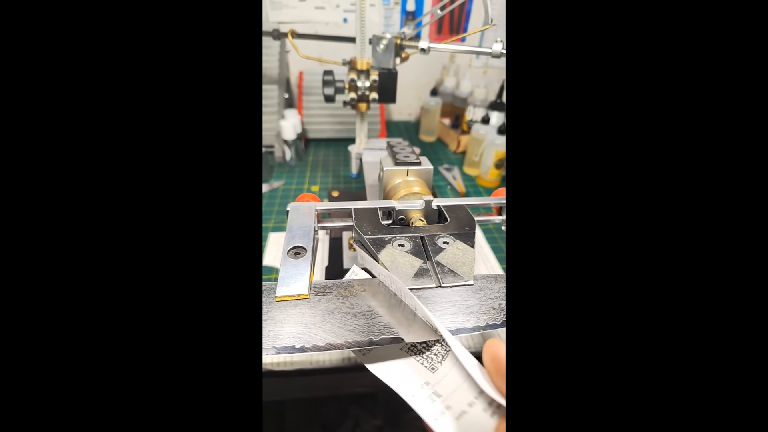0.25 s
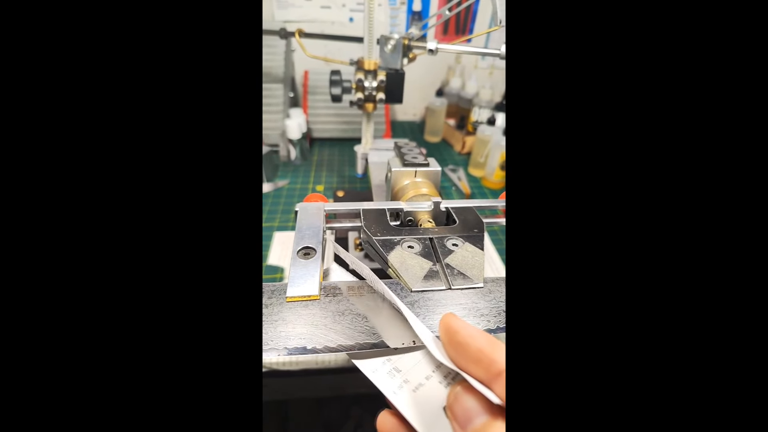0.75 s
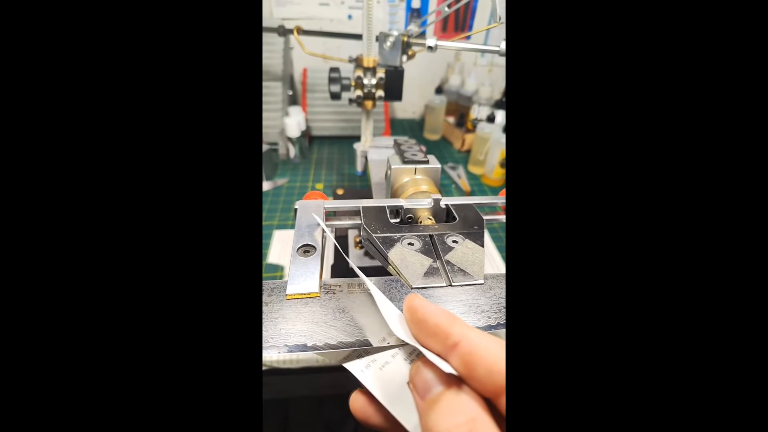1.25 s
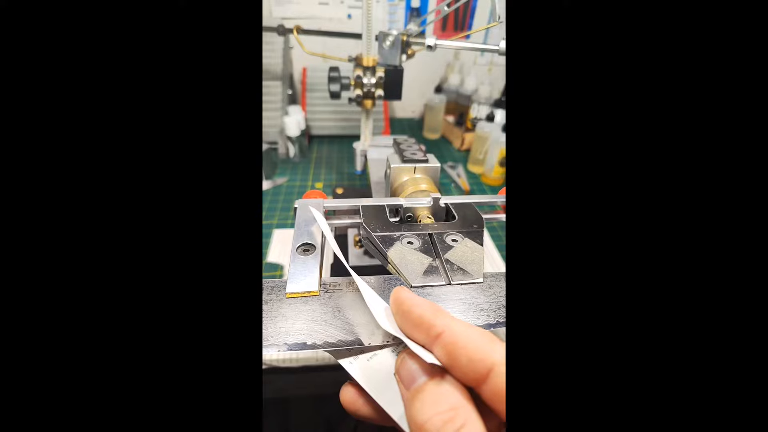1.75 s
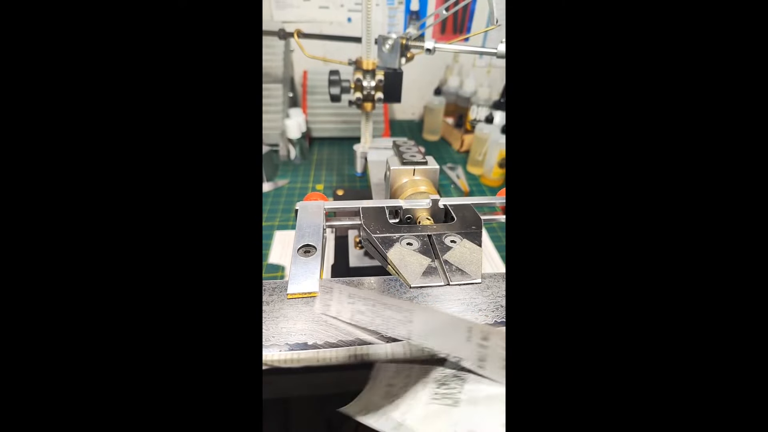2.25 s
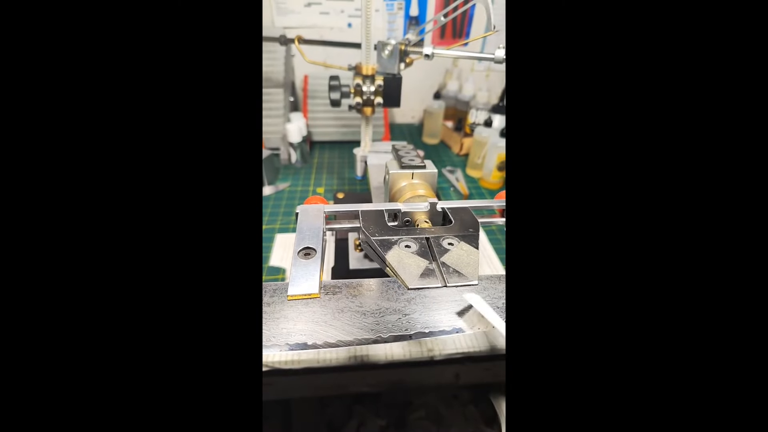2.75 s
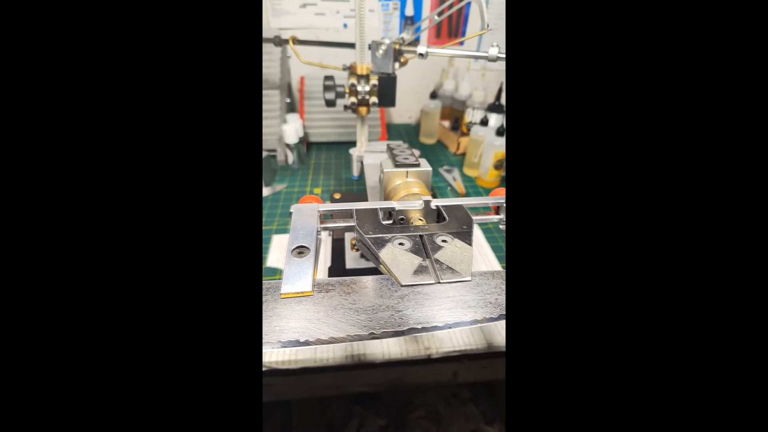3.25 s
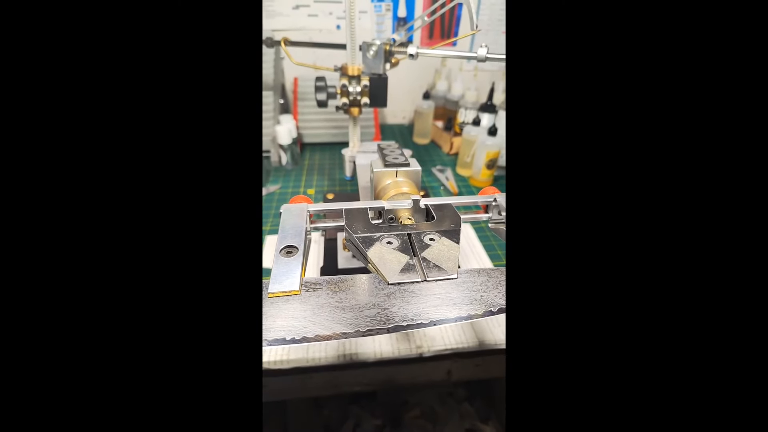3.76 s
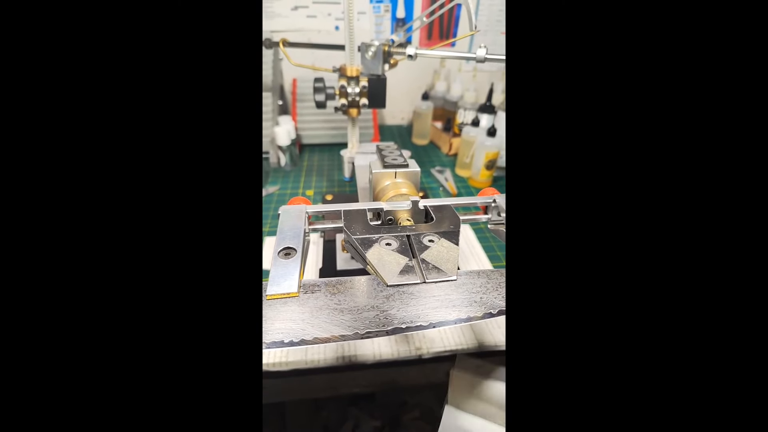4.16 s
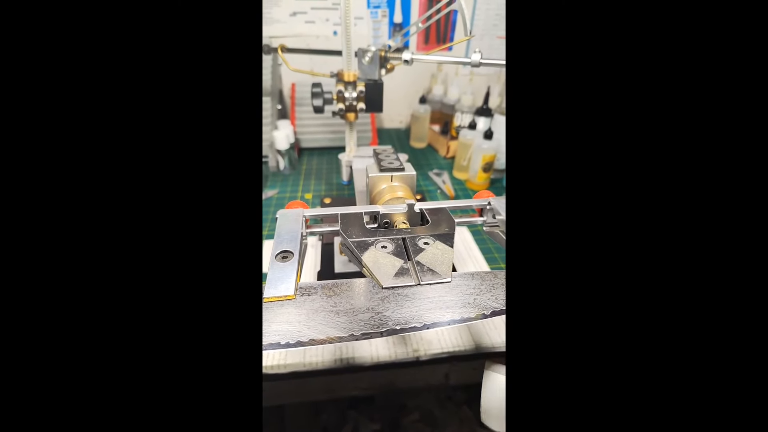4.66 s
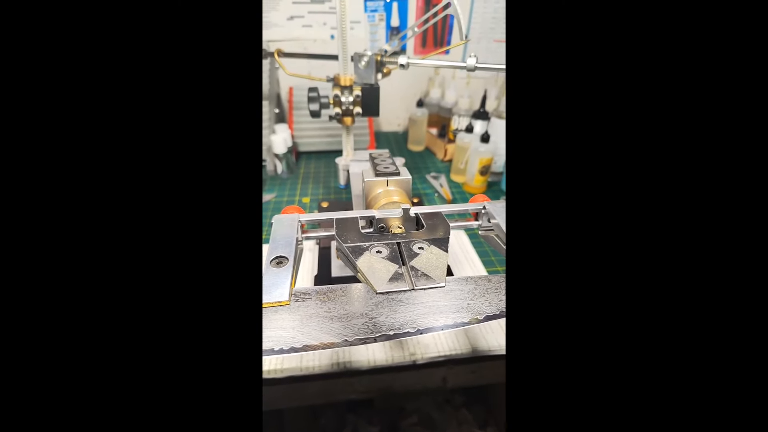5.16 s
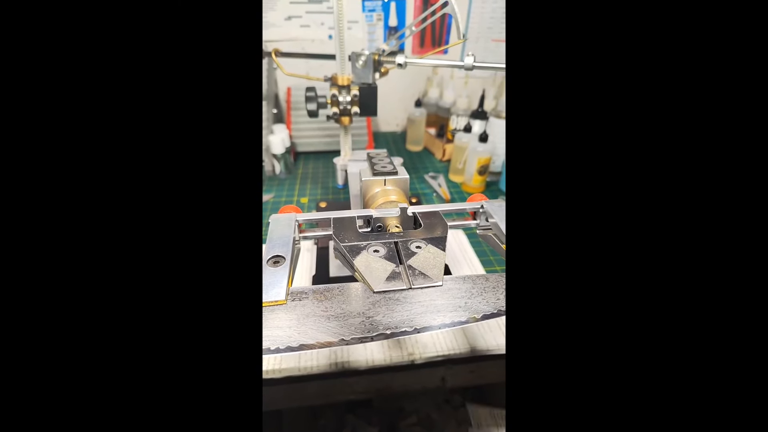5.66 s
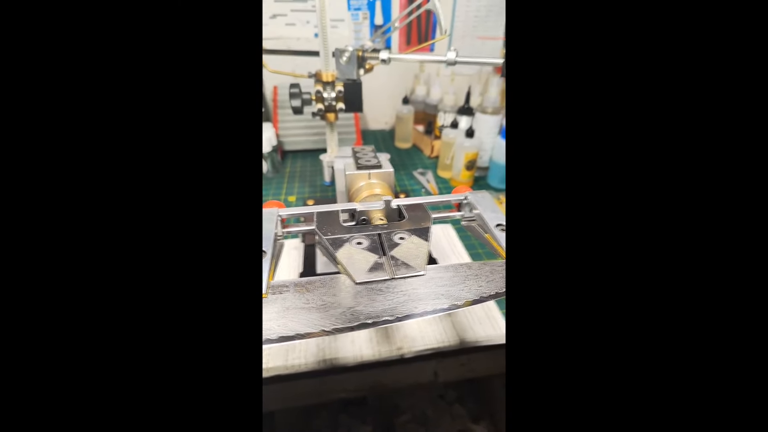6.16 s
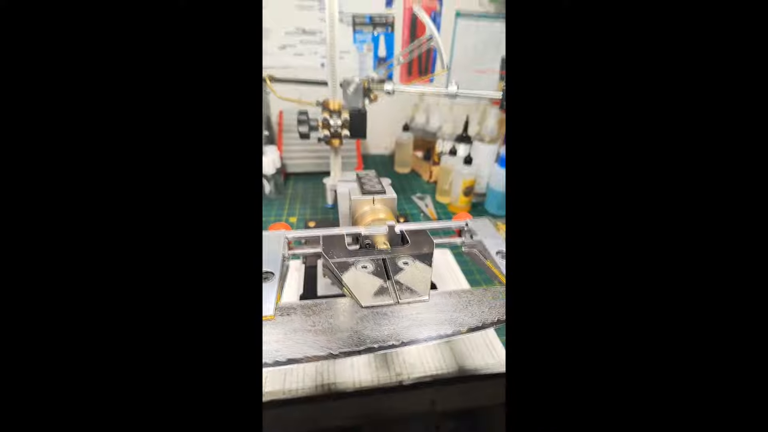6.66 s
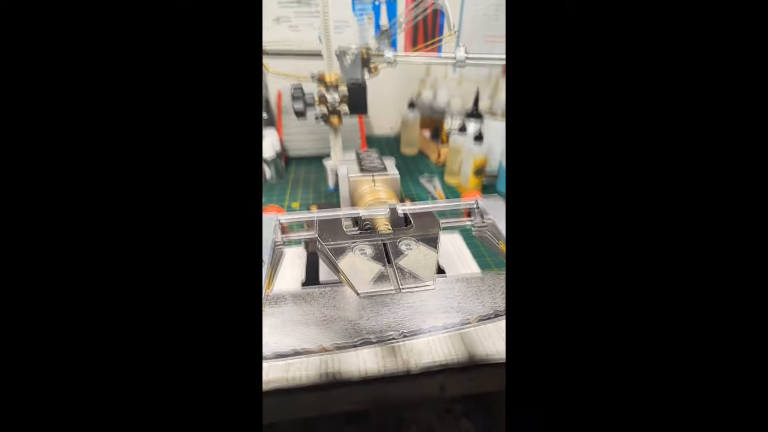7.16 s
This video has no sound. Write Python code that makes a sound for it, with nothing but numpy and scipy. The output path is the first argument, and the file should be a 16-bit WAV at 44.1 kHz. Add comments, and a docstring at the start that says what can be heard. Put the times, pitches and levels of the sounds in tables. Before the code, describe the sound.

Very close microphone in a small quiet workshop, with a short diffuse tail, soft room air and a barely audible low hum. From 0 to 1.1 s a sticky paper strip peels from a clamped blade: dense fine crackle and hiss, with a breathy resonance gliding down from high to middle pitch and small snaps at 0.1, 0.3 and 0.5. Around 1.16 s it jerks loose with a cluster of cracks and a short thump; a thinner, weaker peel with a lower, rising drone fades by 1.9. From 2.1 s the loose paper is folded: crisp snaps, strongest near 2.7 and 2.95, then sparser brief rustles and soft flaps around 3.5, 3.9 and 4.5 to 4.9. A sharp crack comes at 5.3, crumples near 6.0, and another bright snap at 6.5. A short loud rip swells in rapid slips from 6.76 to 6.9, stopping abruptly; faint ticks end it by 7.4.

```python
"""A hand peels a strip of sticky paper off a knife blade clamped in a sharpening jig, close to the microphone.
The glue lets go in a fine crackle of coloured grains and hiss, while the taut strip drones as gliding,
noise-driven resonances. Then the loose paper is folded and crumpled: sharp buckling snaps are short noise
bursts, soft thumps are sagging tones, rustles and one short loud rip are crackles with their own colours.
The place is a small quiet workshop with a short diffuse tail, room air and a faint hum."""
import sys
import numpy as np
from scipy import signal
from scipy.fft import rfft, irfft
from scipy.io import wavfile

SR = 44100
rng = np.random.default_rng(int(sys.argv[2]) if len(sys.argv) > 2 else 0)


def bounce(signal):
    """Save signal as a 16-bit WAV file at the path given by the first command-line argument."""
    frames = np.transpose(np.atleast_2d(signal))
    limited = np.clip(frames, -1, 1)
    pcm = np.round(limited * 32767).astype(np.int16)
    wavfile.write(sys.argv[1], SR, pcm)


N = 326781
BASS_EDGE_HZ, TREBLE_EDGE_HZ = 1400, 3600  # borders of the three registers
CONTROL_STEP_S = 0.001


def amp(db):
    """Decibels to gain."""
    return 10 ** (np.asarray(db) / 20)


def unit(x):
    """Scales to rms 1."""
    return x / np.sqrt(np.mean(x ** 2) + 1e-20)


def read(points, hz):
    """Reads a table on a logarithmic frequency axis."""
    f, value = np.transpose(points)
    return np.interp(np.log(hz + 1), np.log(f + 1), value)


def add(mix, s, sound):
    """Mixes a sound in at time s."""
    part = mix[max(round(s * SR), 0):][:len(sound)]
    part += sound[:len(part)]


def wander(count, hz):
    """Slow chance: straight lines between normal random knots, hz knots a second."""
    knots = rng.standard_normal(4096)
    return np.interp(np.arange(count) * hz / SR, np.arange(len(knots)), knots)


def envelope(t, start, end, attack_s, release_s):
    """Linear attack, hold, exponential release."""
    attack = np.clip((t - start) / attack_s, 1e-5, 1)
    return attack * np.exp(-np.clip((t - end) / release_s, 0, 12))


def colour(x, points, ripple_db=0, pitch=1, ripple_hz=200, size=2048):
    """Causal minimum-phase filter; a random ripple makes the colour of each patch of paper uneven."""
    hz = abs(np.fft.fftfreq(size, 1 / SR))
    heights = np.clip(rng.standard_normal(size), -2, 2)
    ripple = np.interp(hz / ripple_hz, np.arange(size), heights)
    ripple *= np.minimum(hz / TREBLE_EDGE_HZ, 1)  # the ripple is shallower at low frequencies
    log_gain = np.log(amp(read(points, hz / pitch) + ripple_db * ripple))
    ring = np.fft.ifft(np.exp(np.conj(signal.hilbert(log_gain)))).real
    return signal.oaconvolve(x, ring[:size // 2])[:len(x)]


def registers(x):
    """Splits a sound into middle, treble and bass, each of rms 1."""
    edges = [([BASS_EDGE_HZ, TREBLE_EDGE_HZ], "bandpass"), (TREBLE_EDGE_HZ, "highpass"),
             (BASS_EDGE_HZ, "lowpass")]
    parts = []
    for hz, kind in edges:
        band = signal.butter(3, hz, kind, fs=SR, output="sos")
        parts.append(unit(signal.sosfiltfilt(band, x, padtype=None)))
    return parts


def voice(x, db, treble_db, bass_db):
    """Stiff creases radiate treble, wide slack parts of the sheet radiate bass (both relative to the middle)."""
    middle, treble, bass = registers(x)
    return amp(db) * (middle + amp(treble_db) * treble + amp(bass_db) * bass)


def crackle(rows, spectrum, grains_per_s, spread_db, hiss_db, clump_db, clump_hz, ripple_db, shift_oct,
            patch_s=0.035, count=16):
    """Fibres and glue threads let go in clumps over sliding hiss, on patch after patch of differing colour.

    Rows: (time [s], middle level [dB], treble [dB re middle], bass [dB re middle])."""
    s, *columns = np.transpose(rows)
    t = np.arange(s[0], s[-1], 1 / SR)
    sizes = amp(spread_db * np.minimum(rng.exponential(1, len(t)), 4))
    sizes *= rng.choice([-1, 1], len(t))
    grains = unit(sizes * (rng.random(len(t)) < grains_per_s / SR))
    hiss = amp(hiss_db) * rng.standard_normal(len(t))
    drive = (grains + hiss) * amp(clump_db * wander(len(t), clump_hz))

    step = ((t - s[0]) / patch_s + rng.random(len(t))).astype(int)  # neighbouring patches overlap
    patch = rng.integers(0, count, len(t))[step]
    pitch = 2 ** (shift_oct * np.linspace(-1, 1, count))
    sound = np.zeros(len(t))
    for k in range(count):
        here = patch == k
        sound += unit(colour(drive * here, spectrum, ripple_db, pitch[k])) * np.sqrt(np.mean(here))

    out = np.zeros(N)
    add(out, s[0], voice(sound, *(np.interp(t, s, column) for column in columns)))
    return out


def peeling():
    """The pull sets the level and colour of the crackling glue: a slow peel is thin and bright, a hard one fuller."""
    # how hard the strip is pulled off the blade, before jerk and surges: (time [s], level [dB])
    pull_points = [(0, -37), (.15, -41), (.55, -36.5), (.78, -42), (.95, -38), (1.14, -39), (1.235, -50.5),
                   (1.29, -44), (1.46, -47), (1.56, -54), (1.65, -50), (1.7, -58.5), (1.805, -55.5),
                   (1.87, -76)]
    # colour of the glue: (frequency [Hz], relative density [dB per Hz])
    glue = [(55, -54), (85, -15), (450, -10.5), (1100, -6.5), (1800, -6.5), (2850, -7.5), (3500, -13),
            (4500, -15.5), (5500, -9.5), (6740, -16), (7600, -7.5), (12000, -20)]
    jerk_s, jerk_width_s, jerk_db = 1.173, 0.021, 11.5  # the strip jerks loose once, partway along
    surge_db, surge_hz = 1.16, 28.1  # the glue holds unevenly
    reference_db, treble_db, bass_db = -40, -0.5, -6.5  # colour at the reference pull
    treble_slope, thinnest_db = -0.59, -11  # dB per dB of pull; lowest pull re reference that still brightens
    s, pull = np.transpose(pull_points)
    t = np.arange(0, s[-1], CONTROL_STEP_S)
    db = np.interp(t, s, pull)
    jerk = jerk_db * np.exp(-((t - jerk_s) / jerk_width_s) ** 2)
    surges = surge_db * np.interp(t * SR, np.arange(N), wander(N, surge_hz))
    treble = treble_db + treble_slope * np.maximum(db - reference_db, thinnest_db)
    rows = np.column_stack([t, db + jerk + surges, treble, np.full(len(t), bass_db)])
    return crackle(rows, glue, grains_per_s=800, spread_db=1.0, hiss_db=-0.5, clump_db=1.5, clump_hz=199,
                   ripple_db=5.5, shift_oct=0.023)


def strip(rows, width_hz, upper_ratio, upper_db, flutter_db=3, flutter_hz=110, sway_oct=0.07, sway_hz=28):
    """Noise keeps two resonances of the taut strip sounding in uneven spurts; each sways in pitch."""
    s, hz, db = np.transpose(rows)
    t = np.arange(s[0], s[-1], 1 / SR)
    r = np.exp(-np.pi * width_hz / SR)
    out = np.zeros(N)
    for ratio, mode_db in (1, 0), (upper_ratio, upper_db):
        pitch = ratio * np.interp(t, s, hz) * 2 ** (sway_oct * wander(len(t), sway_hz))
        noise = rng.standard_normal(len(t)) + 1j * rng.standard_normal(len(t))
        swing = signal.lfilter([1], np.poly([r, r]), noise)
        carrier = np.exp(2j * np.pi * np.cumsum(pitch) / SR)  # lifts the slow swing to the mode's pitch
        tone = unit((swing * carrier).real * amp(flutter_db * wander(len(t), flutter_hz)))
        add(out, s[0], tone * amp(np.interp(t, s, db) + mode_db))
    return out


def peel_drone():
    """The taut strip rings as it is pulled, in two pulls."""
    # lower resonance of the taut strip in each pull: (time [s], pitch [Hz], level [dB])
    first_pull = [(0, 2300, -39), (.22, 2128, -38), (.47, 1791, -36.5), (.72, 1647, -43.5),
                  (1.14, 1870, -63)]
    second_pull = [(1.18, 623, -48), (1.205, 649, -32.5), (1.235, 690, -52), (1.39, 994, -47.5),
                   (1.55, 953, -65), (1.63, 1052, -43.5), (1.675, 1130, -57), (1.8, 1250, -62)]
    first = strip(first_pull, width_hz=530, upper_ratio=1.33, upper_db=-11)
    second = strip(second_pull, width_hz=300, upper_ratio=2.7, upper_db=-9)
    return first + second


def workshop(x, tail_db=-14, delay_s=0.0041, size=16384):
    """Bench and walls return a short diffuse tail: noise that decays at its own rate in each band."""
    # decay of the workshop: (frequency [Hz], time to fall by 60 dB [s])
    room = [(150, 0.26), (1000, 0.13), (3000, 0.071), (9000, 0.084)]
    hz, t, z = signal.stft(rng.standard_normal(size), SR, nperseg=256)
    tail = signal.istft(z * amp(-60 * t / read(room, hz)[:, None]), SR)[1]
    tail *= np.arange(len(tail)) / SR > delay_s
    return x + amp(tail_db) * signal.fftconvolve(x, tail / np.linalg.norm(tail))[:N]


def background(air_db=-51.5, hum_hz=147.6, hum_db=-62, waver_db=2):
    """Room air is shaped noise; a faint hum wavers in phase and level."""
    # colour of the room air: (frequency [Hz], relative density [dB per Hz])
    air_colour = [(20, 6.5), (60, -17), (90, 2), (450, -8), (1050, -11.5), (3400, -17.5), (6400, -27.5),
                  (9300, -23)]
    hz = np.fft.rfftfreq(N, 1 / SR)
    air = unit(irfft(rfft(rng.standard_normal(N)) * amp(read(air_colour, hz)), N))
    phase = 2 * np.pi * hum_hz * np.arange(N) / SR + 0.51 * wander(N, 8.9)
    hum = unit(np.sin(phase) * amp(waver_db * wander(N, 3.0)))
    return amp(air_db) * air + amp(hum_db) * hum


def snaps(flutter_db=-21, flutter_s=0.0071, creep_db=-21, creep_s=0.0013, rise_s=0.00008, ripple_db=4,
          body_db=10, body_width_hz=850, edge_db=5, edge_hz=7600, edge_scatter_hz=450, edge_width_hz=900,
          evenness=0.73, size=3000, lead_count=150):
    """A crease creeps, flips over in a short broadband crack and leaves the sheet shivering at two resonances."""
    # a crease buckles or the paper jerks free: (time [s], middle level over 5 ms [dB],
    # treble [dB re middle], fading time [s], body resonance [Hz])
    creases = [(0.0965, -24, 4.5, .0019, 2500), (0.3293, -30.5, -12, .0044, 2080),
               (.541, -30, -22, 0.0055, 1930), (1.0704, -33, -23, 0.0059, 1860),
               (1.1586, -27, 1, 0.0025, 1830), (1.1618, -24, 2.5, 0.0068, 2170),
               (1.173, -21, -8, 0.0037, 2400), (2.108, -20.5, -9, 0.00077, 2230),
               (2.191, -24, -1, .0007, 2660), (2.33, -37.5, -12, .0013, 2380),
               (2.375, -30, -11, 0.0017, 2100), (2.3803, -27.5, -1, 0.0013, 2270),
               (2.53, -28, -20, 0.0013, 1990), (2.559, -31.5, -25, .0013, 2370),
               (2.588, -32.5, -23, 0.0018, 2320), (2.6542, -32, -18, 0.00077, 2300),
               (2.669, -26.5, -20, 0.0019, 2380), (2.7051, -13.5, 6, .0006, 2600),
               (2.7891, -39.5, 10, 0.0045, 2320), (2.81, -34, 2, .0041, 2340),
               (2.9176, -35.5, -12, 0.0045, 2620), (2.935, -27.5, 5, .0015, 2720),
               (2.9464, -14, 2, 0.00048, 2500), (2.9796, -29, -11, 0.00038, 2840),
               (3.074, -34.5, -24, 0.0026, 2550), (3.4603, -32, -9, 0.0027, 2520),
               (3.4824, -26, 13.5, .0011, 2570), (3.8186, -33, -5, .002, 2410),
               (3.832, -32, 9.5, 0.00077, 2560), (3.9947, -39, 2, 0.0046, 2650),
               (4.072, -40.5, -15, 0.0035, 2400), (4.4632, -32, 3.5, .0025, 2610),
               (4.4698, -31, 0, 0.0024, 2520), (4.491, -32, 0, 0.0012, 2770), (4.501, -30, 8, 0.0009, 2830),
               (4.5106, -23.5, 10.5, 0.0038, 2880), (4.6536, -28.5, 4, 0.0026, 2640),
               (4.6848, -26, 1, 0.0024, 2790), (4.7358, -23.5, -10.5, 0.00074, 2810),
               (4.819, -36.5, 10.5, .0017, 2450), (4.9309, -31, -22, .0028, 2480),
               (4.9437, -29.5, 4, 0.0019, 2670), (5.3125, -38, 6.5, 0.0026, 2470),
               (5.3235, -16, -3, 0.00046, 2770), (5.3411, -34, 11, 0.0023, 2180),
               (5.3896, -31.5, -3, 0.0021, 1780), (5.403, -28.5, 1, .005, 1700),
               (5.4534, -33.5, -16, .0015, 2530), (5.538, -31.5, 2.5, 0.0012, 2600),
               (5.613, -37, -5, 0.0026, 2620), (5.7223, -37.5, 4, 0.0034, 3000),
               (5.742, -46, -3, 0.0015, 2210), (5.7667, -37, 6, 0.003, 2500),
               (5.982, -34.5, -8, .0029, 2540), (5.9941, -24, 2, 0.0037, 2620),
               (6.04, -23.5, 2.5, .0018, 3060), (6.1342, -39.5, -14, .0032, 2380),
               (6.153, -38, -17, 0.001, 2650), (6.2028, -40, -2.5, 0.0056, 2750),
               (6.273, -40, 7.5, 0.0015, 2580), (6.3308, -42, 11.5, 0.0013, 2310),
               (6.5116, -17.5, 6.5, 0.0017, 2800), (6.5531, -26, 9.5, 0.0019, 2500),
               (6.5644, -34, 9, 0.0042, 2660), (6.7056, -41, 6, 0.0029, 2970),
               (6.7145, -33.5, -7, .003, 1900), (6.7262, -32.5, -4.5, 0.0015, 2130),
               (6.7622, -33, 1, .0014, 2510), (6.77, -28.5, -0.5, 0.0041, 2080),
               (6.865, -24.5, 6.5, 0.002, 2440), (7.0427, -30, -3.5, 0.0017, 2850),
               (7.079, -35.5, 4, 0.0057, 2440), (7.3627, -38.5, -6.5, 0.00094, 2470)]
    # colour of a crease: (frequency [Hz], relative density [dB per Hz])
    crease_colour = [(60, -45.5), (200, -13.5), (1100, -11.5), (2400, -5), (4200, -3.5), (7500, 0.5),
                     (9500, -5.5), (16000, -12)]
    # wider creases flip more slowly and carry more bass
    reference_s, reference_bass_db, bass_per_doubling_db = 0.002, -8.5, 5
    level_window_s = 0.005
    out = np.zeros(N)
    t = (np.arange(size) - lead_count) / SR  # the flip is at 0
    after, hz = np.maximum(t, 0), np.fft.rfftfreq(size, 1 / SR)
    for s, db, treble_db, fade, body_hz in creases:
        bass_db = reference_bass_db + bass_per_doubling_db * np.log2(fade / reference_s)
        burst = (1 - np.exp(-after / rise_s)) * np.exp(-(after / fade) ** 2)
        creep = amp(creep_db) * np.exp(-abs(t) / creep_s)
        flutter = amp(flutter_db) * np.exp(-after / flutter_s) * (t > 0)
        flip, tremble = rng.choice([-1, 1], (2, size))

        z = rfft(burst * flip)
        z = z / (abs(z) + 1e-9) ** np.clip(evenness, 0, 1)  # evens out the random spectrum
        crack = unit(irfft(z, size)) * np.sqrt(np.mean(burst ** 2))

        edge = edge_hz + edge_scatter_hz * rng.standard_normal()
        body_peak = body_db * np.exp(-((hz - body_hz) / body_width_hz) ** 2)
        edge_peak = edge_db * np.exp(-((hz - edge) / edge_width_hz) ** 2)
        spectrum = read(crease_colour, hz) + body_peak + edge_peak
        snap = colour(crack + (creep + flutter) * tremble, np.column_stack([hz, spectrum]), ripple_db)
        # the level counts as if all the energy fell within the window
        add(out, s + t[0], voice(snap, db, treble_db, bass_db) * np.sqrt(level_window_s * SR / size))
    return out


def flaps(gain_db=3.5, fade_cycles=1.04, rise_cycles=0.15, sag=0.045):
    """The slack sheet pushes air: a soft thump that sags in pitch and dies within a few cycles."""
    # flaps of the sheet: (time [s], level before gain_db [dB], starting pitch [Hz])
    thumps = [(0.847, -29.5, 280), (1.157, -12.5, 830), (1.173, -19.5, 454), (2.921, -28, 304),
              (2.944, -27, 454), (2.944, -37, 70), (3.866, -26.5, 663), (3.994, -29.5, 377),
              (4.51, -30, 292), (4.943, -25.5, 307), (5.992, -23, 686), (6.035, -26.5, 530),
              (6.51, -31.5, 273)]
    out, t = np.zeros(N), np.arange(4096) / SR
    for s, db, hz in thumps:
        cycles = hz * t
        turns = np.log1p(sag * cycles) / sag
        shape = np.exp(-cycles / fade_cycles) * (1 - np.exp(-cycles / rise_cycles))
        add(out, s, amp(db + gain_db) * np.sin(2 * np.pi * turns) * shape)
    return out


def rubbing():
    """Fingers slide and fold the loose paper; each rub eases in, swells and dies away, overlaps add in power."""
    # rubs: (start [s], length [s], middle level before the swell [dB],
    # treble [dB re middle], bass [dB re middle])
    rubs = [(1.987, 0.18, -57.5, 0, -8), (2.102, 0.16, -53.5, 1.5, -10), (2.343, 0.16, -45, 0, -14),
            (2.523, 0.05, -37.5, -5, -8), (2.591, 0.096, -40.5, 6.5, -12),
            (2.733, 0.019, -35.5, 4.5, -17.5), (2.809, 0.048, -37.5, -2, -15.5),
            (2.907, 0.057, -39.5, -2, -3), (2.987, 0.19, -53.5, 2, -3), (3.404, 0.18, -45.5, 2.5, -5),
            (3.464, 0.062, -34.5, 2.5, -8), (3.686, 0.071, -44.5, 5.5, -8.5),
            (3.815, 0.045, -39.5, 4.5, -17), (3.858, 0.021, -37.5, -1.5, -3), (3.975, 0.041, -45, 8, -7.5),
            (4.135, 0.045, -50.5, 1.5, -3), (4.219, 0.046, -40.5, -0.5, -2), (4.295, 0.28, -47.5, -3, -6.5),
            (4.469, 0.056, -30.5, -3.5, -8), (4.553, 0.093, -45, -9, -5.5), (4.649, 0.15, -48, -2.5, 0),
            (4.811, 0.073, -48, 5.5, 0.5), (4.908, 0.11, -53, 6.5, 1.5), (5.046, 0.07, -46, 2.5, -4),
            (5.203, 0.074, -48.5, 1, -15), (5.312, 0.1, -37, -3, -12.5), (5.448, 0.063, -41, -3.5, -7),
            (5.551, 0.041, -40, -5, -6), (5.598, 0.19, -47.5, -2.5, 2), (5.872, 0.048, -47.5, -1.5, -2),
            (5.98, 0.095, -42, 1, -5), (6.214, 0.082, -45.5, 3, -4.5), (6.332, 0.022, -42.5, -15, -2),
            (6.509, 0.073, -37, 4.5, -6), (6.59, 0.0084, -35.5, 12, -6), (6.627, 0.026, -41.5, -9, -5),
            (6.693, 0.045, -47.5, 4, 2), (6.899, 0.042, -44.5, 1.5, -0.5), (6.977, 0.035, -51, 3.5, -7),
            (7.037, 0.067, -50.5, -3, -5.5), (7.27, 0.034, -50, -2.5, -2)]
    # colour of the paper: (frequency [Hz], relative density [dB per Hz])
    paper = [(55, -33.5), (85, -2.5), (380, 0.5), (1050, -3), (1750, -9), (2370, 1), (2920, -4),
             (3600, -7.5), (4900, -8.5), (8100, -1), (12000, -18.5)]
    attack_s, release_s, swell_db = 0.024, 0.019, 2.5
    t = np.arange(0, N / SR, CONTROL_STEP_S)
    power = np.zeros((3, len(t)))
    for start, length, db, treble_db, bass_db in rubs:
        swell = swell_db * (np.sin(np.pi * np.clip((t - start) / length, 0, 1)) - 0.5)
        shape = envelope(t, start - attack_s / 2, start + length, attack_s, release_s)
        gain = amp(db + swell) * shape
        power += np.outer(amp([0, treble_db, bass_db]), gain) ** 2
    middle, treble, bass = 10 * np.log10(power)
    rows = np.column_stack([t, middle, treble - middle, bass - middle])
    return crackle(rows, paper, grains_per_s=600, spread_db=2.2, hiss_db=-2, clump_db=3.5, clump_hz=170,
                   ripple_db=6.5, shift_oct=0.14)


def ripping():
    """One tear catches, swells in quick slips and stops when the paper parts, while the taut paper rings."""
    # colour of the tear: (frequency [Hz], relative density [dB per Hz])
    tear = [(55, -35.5), (90, -9.5), (1000, -17.5), (1700, -11), (2400, 1), (3100, -7.5), (3350, -27),
            (4100, -4), (5050, -10), (5700, -0.5), (7800, 3), (13000, -12)]
    # lower resonance of the tearing paper: (time [s], pitch [Hz], level [dB])
    rip_pull = [(6.775, 1319, -36), (6.803, 1250, -27.5), (6.85, 1500, -52)]
    start_s, end_s, attack_s, release_s = 6.7615, 6.897, 0.031, 0.0041
    slip_hz, slip_db = 108.7, 6.5  # each slip starts hard and eases off
    start_db, growth_db = -28.5, 10
    treble_db, treble_change_db, bass_db, bass_change_db = 6.5, -0.5, -8, -2
    t = np.arange(6.7, 7, CONTROL_STEP_S)
    progress = np.clip((t - start_s) / (end_s - start_s), 0, 1)
    slips = slip_db * (0.5 - (t - start_s) * slip_hz % 1)
    shape_db = 20 * np.log10(envelope(t, start_s, end_s, attack_s, release_s))
    db = start_db + growth_db * progress ** 2 + slips + shape_db
    rows = np.column_stack([t, db, treble_db + treble_change_db * progress, bass_db + bass_change_db * progress])
    rip = crackle(rows, tear, grains_per_s=1800, spread_db=2.0, hiss_db=-4.5, clump_db=0.5, clump_hz=460,
                  ripple_db=4.0, shift_oct=0)
    return rip + strip(rip_pull, width_hz=340, upper_ratio=1.8, upper_db=-6)


def scene():
    """Peeling, handling and ripping, with snaps throughout, in the workshop."""
    paper_sounds = peeling() + peel_drone() + snaps() + flaps() + rubbing() + ripping()
    return (workshop(paper_sounds) + background())[None]


def record(dry):
    """The recorder's colour, then a bass limit, overload at full scale, and a treble limit."""
    # recorder's colour, a sharp step down near 9.7 kHz, a hump at 12 kHz, then a fall:
    # (frequency [Hz], level [dB])
    recorder = [(20, -1), (9450, -0.5), (9900, -27), (10700, -26), (12000, -11.5), (13300, -23),
                (13900, -21), (15600, -34)]
    low_cut = signal.butter(2, 52, "highpass", fs=SR, output="sos")
    x = signal.sosfilt(low_cut, colour(dry[0], recorder))
    high_cut = signal.firwin(511, 16000, window=("kaiser", 9), fs=SR)
    return signal.oaconvolve(np.clip(x, -1, 1), high_cut, "same")[None]


dry = scene()
out = record(dry)
bounce(out)
```